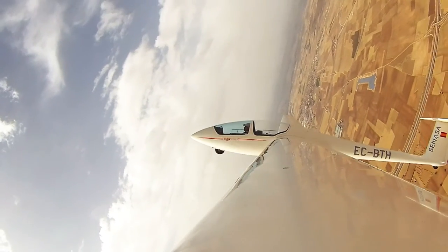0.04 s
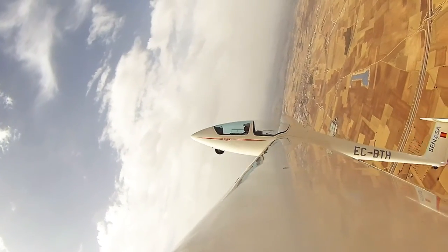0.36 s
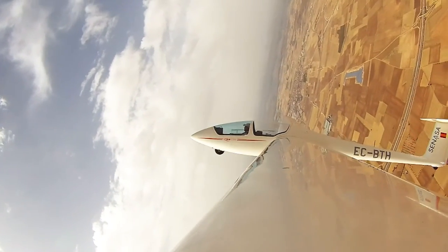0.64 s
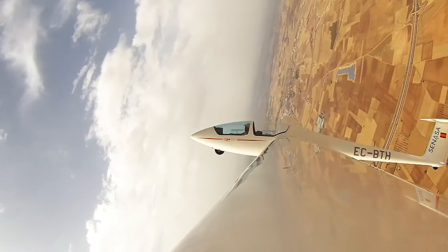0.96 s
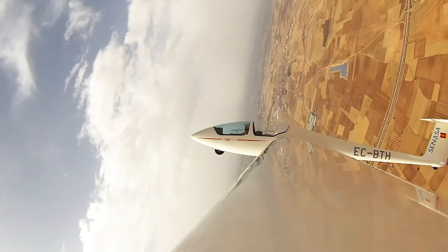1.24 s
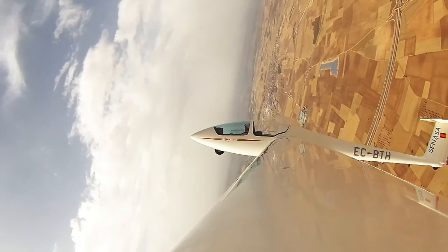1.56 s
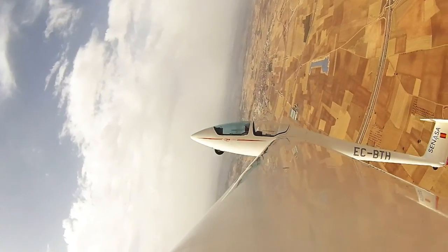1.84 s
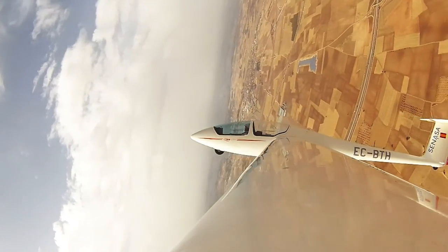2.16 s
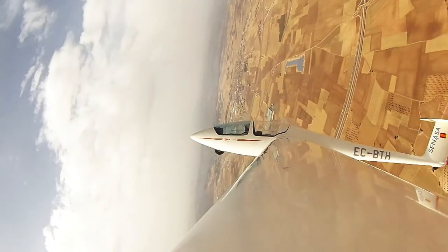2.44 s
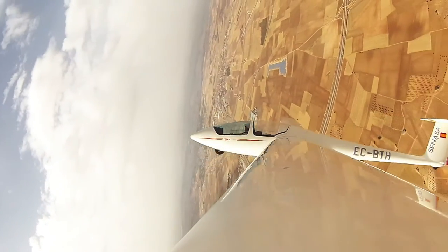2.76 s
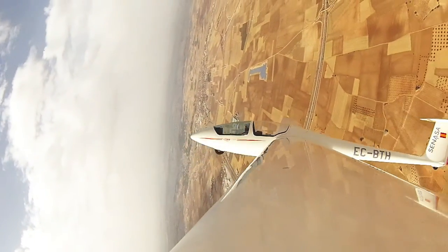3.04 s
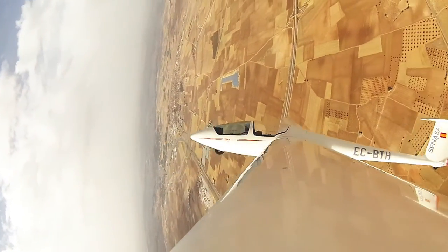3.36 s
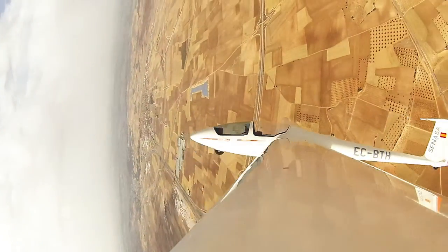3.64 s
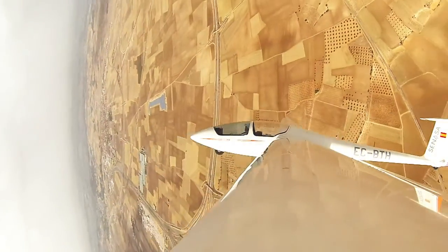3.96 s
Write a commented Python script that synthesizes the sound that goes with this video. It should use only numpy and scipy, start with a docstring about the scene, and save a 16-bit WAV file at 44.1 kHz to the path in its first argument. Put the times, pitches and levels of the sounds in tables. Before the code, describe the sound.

Wind rushes past a diving glider, growing louder and brighter over a low buffeting rumble.

```python
"""Air rushes over a closed camera case on the wing of a glider that dives and gathers speed.
At first fine turbulence excites the fixed resonances of the case, faint and dull, and the case ticks.
After a second, large eddies buffet the mount into a low rumble while the rush grows louder and brighter.
Near two seconds the wing skin drums and the case ticks again, harder. Then gaps hiss and whistle
briefly, and the rush stays loud to the end."""
import sys
import numpy as np
from scipy import signal
from scipy.fft import rfft, irfft
from scipy.io import wavfile
from scipy.ndimage import uniform_filter1d

SR = 44100
rng = np.random.default_rng(int(sys.argv[2]) if len(sys.argv) > 2 else 0)


def transcribe(signal):
    """Save signal, clipped to [-1, 1], as a 16-bit WAV file at the path in sys.argv[1]."""
    frames = np.atleast_2d(signal).T
    limited = np.clip(frames, -1, 1)
    pcm = np.round(limited * 32767).astype(np.int16)
    wavfile.write(sys.argv[1], SR, pcm)


N = 176400
T = np.arange(N) / SR
HZ = np.maximum(np.arange(N // 2 + 1) * SR / N, 1)

# Levels are relative; each spectrum gives the shape of a spectral density.
# microphone self-noise (f/Hz, level/dB)
HISS_SPECTRUM = [(100, -4), (2000, -6), (4500, -5), (8000, -10), (10000, -13), (11900, -9), (13500, -20),
                 (15200, -18)]
# wash of passing air: envelope (t/s, level/dB), spectrum (f/Hz, level/dB)
WASH_ENVELOPE = [(0, -65.5), (.6, -62.5), (1.1, -57.5), (1.5, -48), (2, -45.5), (2.5, -38), (2.95, -34.5),
                 (3.2, -38), (3.6, -38.5), (4, -36)]
WASH_SPECTRUM = [(150, -26), (350, 3), (550, 0), (900, -3), (1500, -6), (3000, -19), (6000, -72),
                 (15000, -52)]
# wing skin: envelope (t/s, level/dB), spectrum (f/Hz, level/dB), modes (f/Hz, width/Hz, lift/dB)
SKIN_ENVELOPE = [(0.0, -48), (0.09, -60.5), (1.85, -33.5), (1.96, -24.5), (2.04, -35.5), (2.37, -29),
                 (2.49, -33), (2.54, -23), (2.85, -33.5), (2.87, -31), (3.97, -35), (4.0, -29.5)]
SKIN_SPECTRUM = [(60, -21), (125, -0.5), (165, -4.5), (280, -9.5), (400, -28), (900, -52), (3000, -70)]
SKIN_MODES = [(208.6, 28, 12.8), (256.5, 20, 5.2)]
# air catching at gaps (peak t/s, 1/e half-length/s, f/Hz, 1/e half-width/Hz, level/dB)
GAP_WHISTLES = [(2.353, 0.33, 7040, 800, -37.5), (2.873, 0.15, 12800, 1490, -42),
                (2.945, 0.0085, 12200, 300, -32), (2.984, .006, 12300, 300, -33),
                (3.056, .005, 12350, 300, -36)]
# knocks in the case (t/s, level/dB)
CASE_TICKS = [(0.864, -33.5), (2.071, -10.5)]
# large eddies shaking the mount: envelope (t/s, level/dB), spectrum (f/Hz, level/dB)
BUFFET_ENVELOPE = [(0.0, -48), (1.0, -36), (1.17, -23), (1.24, -37.5), (1.34, -22.5), (1.55, -28),
                   (1.59, -20.5), (1.76, -29), (1.8, -19.5), (1.87, -23), (1.95, -11), (2.09, -22),
                   (2.17, -14), (2.29, -19.5), (2.37, -13), (2.48, -19), (2.67, -10.5), (2.75, -22),
                   (2.9, -20), (2.99, -26), (3.07, -19), (3.24, -23), (3.36, -16.5), (3.42, -31.5),
                   (3.62, -17), (3.68, -27), (3.73, -18), (4.0, -28)]
BUFFET_SPECTRUM = [(10, -5.5), (25, -5), (50, -1), (100, -9), (150, -21.5), (250, -37), (600, -70)]
# mount: modes (f/Hz, width/Hz, lift/dB), evenness of its swing (t/s, share from 0 fitful to 1 even)
MOUNT_MODES = [(63, 12.8, 18.9), (97, 12, 3)]
MOUNT_LOCK_IN = [(0, 0), (1.9, 0.95), (2.7, 0.23), (3.2, 0.94)]
# fine turbulence on the case: envelope (t/s, level/dB), spectrum (f/Hz, level/dB)
RUSH_ENVELOPE = [(0, -74), (.22, -65.5), (.39, -59), (.48, -49.5), (.66, -43), (1.0, -36.5), (1.33, -30.5),
                 (1.5, -28), (1.65, -23.5), (1.98, -21.5), (2.12, -19.5), (2.25, -19.5), (2.44, -17),
                 (2.55, -18.5), (2.62, -19), (2.74, -21), (2.85, -16.5), (3.0, -14), (3.15, -17.5),
                 (3.27, -18.5), (3.315, -16), (3.36, -15.5), (3.52, -14.5), (3.8, -17.5), (4, -15.5)]
RUSH_SPECTRUM = [(200, -33), (600, -28), (950, -22), (1250, -15), (1600, -8), (3500, -7), (4200, -18),
                 (6500, -16.5), (8000, -25), (13000, -27), (15200, -36)]
# fall of the treble while small eddies lag behind large ones (t/s, slope/(dB per octave))
TREBLE_ROLLOFF = [(0, 11), (.4, 13.5), (.6, 10.5), (1.0, 6.5), (1.2, 5), (1.7, 4), (2.15, 2.5), (2.4, 2),
                  (2.72, 1.2), (3.05, 2.5), (3.31, 1.9), (3.36, 1.2), (3.55, 1.5), (3.8, -0.26), (4, -0.2)]
# resonances of the case (f/Hz, width/Hz, lift/dB)
CASE_MODES = [(653, 110, 11), (1592, 324, 12), (2100, 230, 0.5), (2700, 247, 8.5), (3250, 530, 7),
              (3810, 246, 6.5), (4540, 380, 6), (6003, 730, 13.5), (7270, 380, 2.5), (8420, 350, 6),
              (9280, 250, 5), (10500, 410, 10.5), (11100, 350, 4), (12200, 370, 7.5)]
# part of the flow noise that differs between the channels (f/Hz, level/dB)
SIDE_RESPONSE = [(60, -57), (110, -40), (200, -44), (380, -24.5), (690, -31.5), (1280, -38), (2360, -44.5),
                 (4350, -26.5), (8030, -21.5), (14800, -21)]

HISS_DB, WASH_DB, SKIN_DB, BUFFET_DB, RUSH_DB, SIDE_DB = -69.5, -0.5, 2, 2, 1.5, -2


def undb(db):
    """Amplitude ratio for a level in decibels."""
    return 10 ** (np.asarray(db) / 20)


def unit(x):
    """Normalisation to rms 1."""
    return x / np.sqrt(np.mean(x ** 2))


def curve(rows):
    """Linear interpolation of (t/s, value) rows."""
    return np.interp(T, *np.array(rows, float).T)


def filtered_noise(gain):
    """Spectral shaping: white noise weighted by a gain at each frequency, at rms 1."""
    return unit(irfft(rfft(rng.standard_normal(N)) * gain, N))


def fluctuation(rate_hz):
    """Low-pass filtering turns noise into a smooth random motion of rms 1."""
    return filtered_noise(1 / (1 + (HZ / rate_hz) ** 2))


def spectrum_db(rows):
    """Interpolation of (f/Hz, level/dB) rows over log frequency."""
    hz, db = np.array(rows, float).T
    return np.interp(np.log(HZ), np.log(hz), db)


def coloured_noise(spectrum, modes=()):
    """Source and filter: broadband noise gains a peak at each mode given; rms 1."""
    octaves_above_top = np.log2(np.maximum(HZ / spectrum[-1][0], 1))
    db = spectrum_db(spectrum) - 12 * octaves_above_top
    for centre, width, lift in modes:
        db = db + lift / (1 + (2 * (HZ - centre) / width) ** 2)
    return filtered_noise(undb(db))


def microphone_hiss(flutter_db=3):
    """Self-noise sets a faint noise floor, whose level flutters."""
    return coloured_noise(HISS_SPECTRUM) * undb(HISS_DB + flutter_db * fluctuation(rate_hz=12))


def air_wash():
    """Flow noise: the passing air makes a dull broadband wash."""
    return coloured_noise(WASH_SPECTRUM) * undb(WASH_DB + curve(WASH_ENVELOPE))


def wing_drumming():
    """Panel vibration: the wing skin drums at two low modes."""
    return coloured_noise(SKIN_SPECTRUM, SKIN_MODES) * undb(SKIN_DB + curve(SKIN_ENVELOPE))


def gap_whistles():
    """Aerodynamic sound: air catching at gaps gives high bands of noise that swell and fade."""
    out = 0
    for peak_time, half_length, hz, half_width, db in GAP_WHISTLES:
        band = filtered_noise(np.exp(-((HZ - hz) / half_width) ** 2))
        out = out + band * undb(db) * np.exp(-((T - peak_time) / half_length) ** 2)
    return out


def case_ticks(mode_hz=1610, decay_s=0.011):
    """Damped free vibration: each knock rings one mode of the case, which decays exponentially."""
    out = 0
    for start, db in CASE_TICKS:
        age = np.maximum(T - start, 0)
        out = out + undb(db) * np.exp(-age / decay_s) * np.sin(2 * np.pi * mode_hz * age)
    return out


def mount_buffeting():
    """Lock-in: large eddies shake the mount at resonance, more evenly when the flow locks on to it."""
    shake = coloured_noise(BUFFET_SPECTRUM, MOUNT_MODES)
    running_rms = np.sqrt(uniform_filter1d(shake ** 2, size=2200))  # over 50 ms
    lock_in = np.clip(curve(MOUNT_LOCK_IN), 0, 1)
    return unit(shake / running_rms ** lock_in) * undb(BUFFET_DB + curve(BUFFET_ENVELOPE))


def case_rush(knee_hz=1630, flicker_db=0.73, flutter_db=0.75):
    """Forced vibration: fine turbulence drives the case modes, louder and brighter with speed."""
    spectrum = rfft(coloured_noise(RUSH_SPECTRUM, CASE_MODES))
    half_octaves = np.clip(2 * np.log2(HZ / knee_hz), 0, None)
    rolloff = curve(TREBLE_ROLLOFF)
    out = 0
    for k in range(8):  # bands half an octave apart flicker independently
        band = irfft(spectrum * np.maximum(1 - abs(half_octaves - k), 0), N)
        tilt_db = -rolloff * (k - .6) / 2
        out = out + band * undb(tilt_db + flicker_db * fluctuation(rate_hz=36))
    lull_db = curve([(3.235, 0), (3.334, 2.4), (3.345, 0)])  # the flow eases before the last gust
    level_db = RUSH_DB + curve(RUSH_ENVELOPE) - lull_db
    return out * undb(level_db + flutter_db * fluctuation(rate_hz=12))


def scene():
    """Superposition: all sound arrives through the case, so it is almost mono, the treble a little wider."""
    mid = microphone_hiss() + air_wash() + wing_drumming() + gap_whistles() + case_ticks()
    mid = mid + mount_buffeting() + case_rush()
    uncorrelated_flow = air_wash() + wing_drumming() + mount_buffeting() + case_rush()
    side = irfft(rfft(uncorrelated_flow) * undb(SIDE_DB + spectrum_db(SIDE_RESPONSE)), N)
    return mid + side * np.array([[1], [-1]])


def record(dry, cutoff_hz=15100):
    """Saturation rounds the highest peaks, and a steep low-pass filter limits the bandwidth."""
    rounded = dry / (1 + dry ** 8) ** (1 / 8)
    low_pass = signal.ellip(10, .1, 90, cutoff_hz, fs=SR, output="sos")
    return signal.sosfilt(low_pass, rounded)


dry = scene()
out = record(dry)
transcribe(out)
```